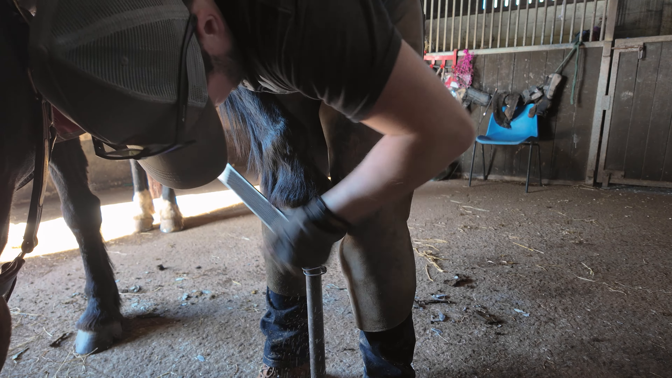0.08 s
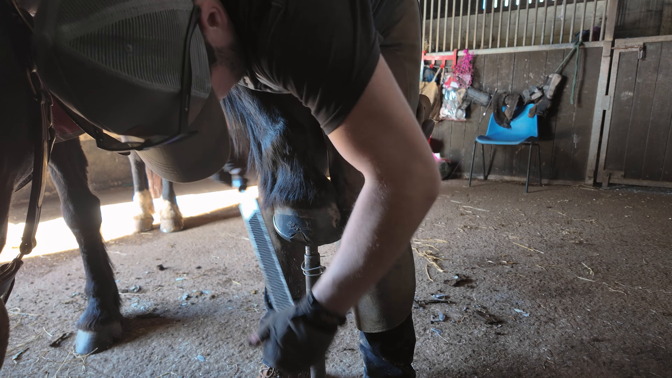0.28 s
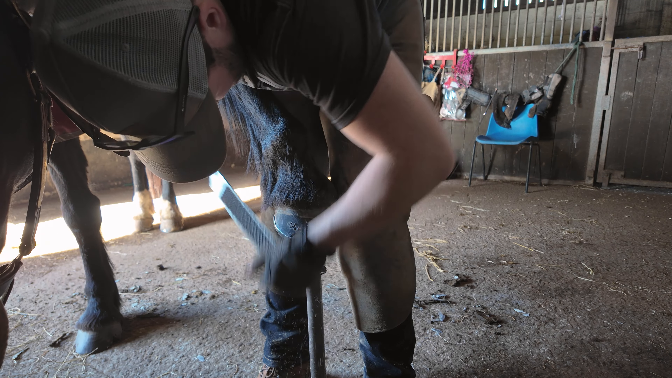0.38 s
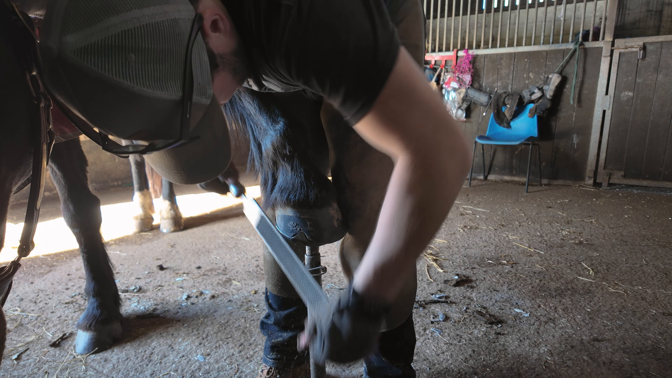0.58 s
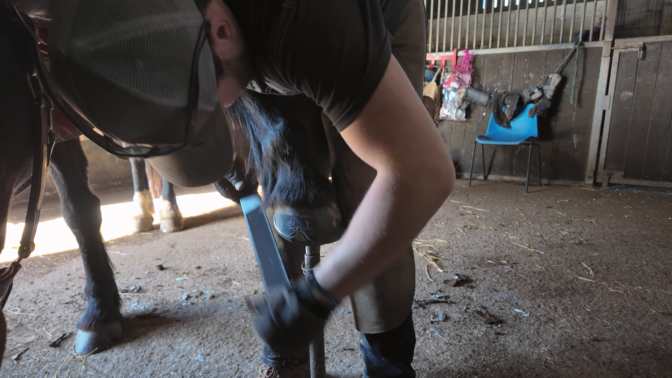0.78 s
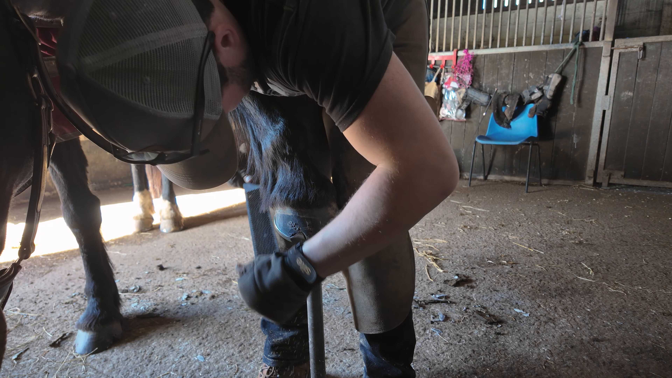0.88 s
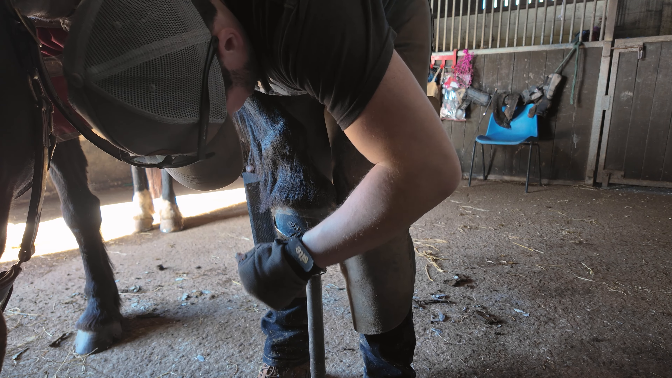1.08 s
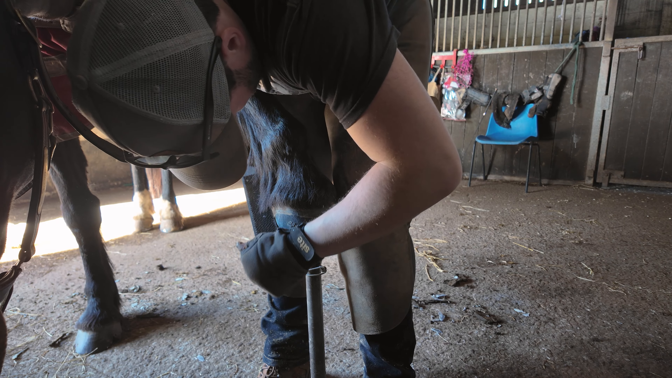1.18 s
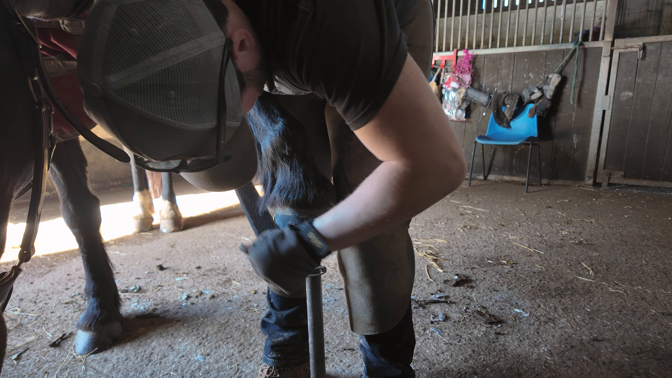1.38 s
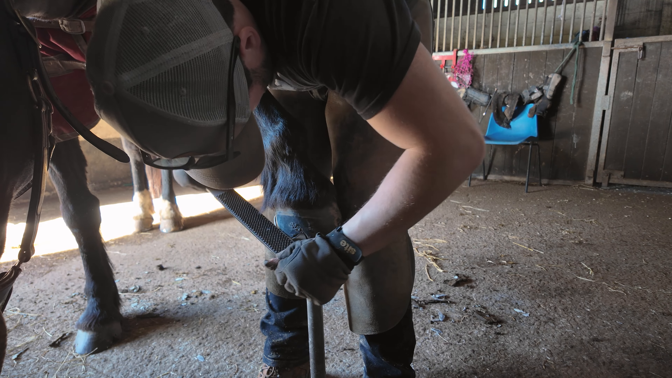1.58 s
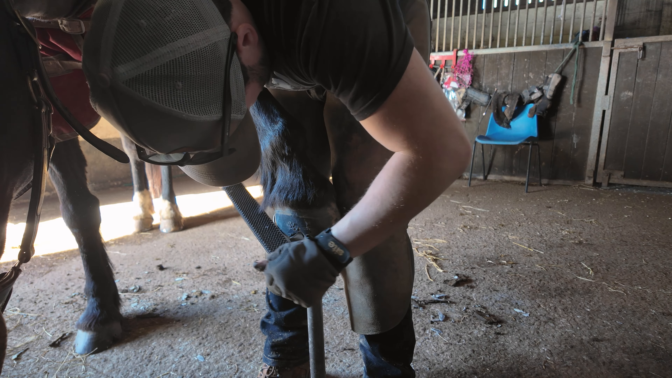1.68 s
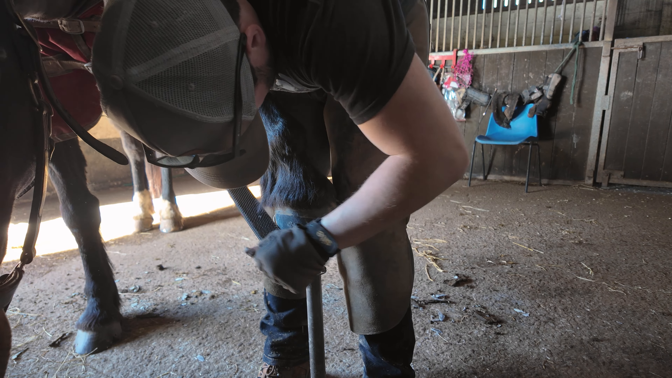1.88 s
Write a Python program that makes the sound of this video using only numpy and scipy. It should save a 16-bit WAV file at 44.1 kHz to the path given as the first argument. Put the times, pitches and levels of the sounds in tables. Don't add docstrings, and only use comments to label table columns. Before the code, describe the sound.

A steel rasp works a horse's hoof, heard close in a quiet stable with short echoes. Two hard strokes, 0.15-0.4 s and 0.55-0.8 s, crackle densely with bright metallic ringing, woody hoof resonance and low iron-stand thumps; the steel rings freer as each ends. Much lighter flicks follow near 1.04, 1.2-1.3, 1.56 and 1.84 s. Faint cloth and straw rustle continues throughout.

```python
import sys
import numpy as np
from scipy import signal
from scipy.io import wavfile
from scipy.ndimage import uniform_filter1d

SR = 44100
rng = np.random.default_rng(int(sys.argv[2]) if len(sys.argv) > 2 else 0)


def undo_db(level):
    steps = np.asarray(level, float) / 20
    return 10 ** steps


def bounce(signal):
    frames = np.transpose(np.atleast_2d(signal))
    limited = np.clip(frames, -1, 1)
    pcm = np.round(limited * 32767).astype(np.int16)
    wavfile.write(sys.argv[1], SR, pcm)


N = 83790
TIME_S = np.arange(N) / SR
WANDER = 0.003


def evened(x):
    return x / np.sqrt(np.mean(x ** 2) + 1e-20)


def slow(count):
    once = uniform_filter1d(rng.standard_normal(N), count)
    return evened(uniform_filter1d(once, count))


def grit(per_s, spread_db):
    draw, size, sign = rng.random(N), rng.exponential(1, N), rng.standard_normal(N)
    click = np.clip((per_s / SR - draw) * SR / 200, 0, 1)
    return evened(click * undo_db(spread_db * np.minimum(size, 4)) * sign)


def read(points, hz):
    f, value = np.transpose(points)
    return np.interp(np.log(hz + 1), np.log(f + 1), value)


def coloured(x, spectrum):
    level_db = read(spectrum, abs(np.fft.fftfreq(4096, 1 / SR)))
    log_gain = np.log(undo_db(np.maximum(level_db, -100)))
    taps = np.fft.ifft(np.exp(np.conj(signal.hilbert(log_gain)))).real[:2048]
    return signal.oaconvolve(x, taps / np.linalg.norm(taps))[:N]


def ring(x, hz, width_hz):
    skirt = 5.9
    turn = np.exp(2j * np.pi * np.cumsum(hz * np.ones(N)) / SR)
    r = np.exp(-np.pi * width_hz / SR)
    wide = np.exp(-np.pi * skirt * width_hz / SR)
    still = x / turn + 1e-18
    damped = signal.lfilter([(1 - r) * (1 - wide)], [1, -r - wide, r * wide], still)
    return 2 * (turn * damped).real


def body(x, modes, contact=None):
    node_depth, node_hz = 0.99, 90.1
    out = np.zeros(N)
    for k, (hz, width_hz, db) in enumerate(modes):
        shape = 1
        if contact is not None:
            standing = abs(np.cos(np.pi * np.sqrt(hz / node_hz) * contact + k))
            shape = 1 - node_depth + node_depth * np.sqrt(2) * standing
        pitch_hz = hz * (1 + WANDER * slow(count=500))
        out += (-1) ** k * undo_db(db) * ring(x * shape, pitch_hz, width_hz)
    power = sum(np.pi * width_hz / SR * undo_db(2 * db) for _, width_hz, db in modes)
    return out / np.sqrt(power)


# pitch_hz, level_db [dB per Hz]
AIR_SPECTRUM = [(30, -1.5), (80, -1.5), (136, -12.5), (340, -6.5), (600, -17), (1500, -19.5), (3500, -19.5),
                (15500, -57)]


def air():
    level_db = -55.5 - 4.5 + 0.14 * slow(count=2000)
    return undo_db(level_db) * coloured(rng.standard_normal(N), AIR_SPECTRUM)


# start_s, level_db
RUSTLE_LEVEL = [(0, -48), (0.032, -51), (.11, -51.5), (.16, -53), (.42, -54.5), (0.501, -51.5),
                (.55, -57.5), (.8, -51), (.87, -56.5), (0.944, -55), (0.981, -65), (1.1, -63), (1.15, -60),
                (1.4, -60.5), (1.46, -63), (1.62, -54), (1.68, -73), (1.9, -55.5)]
# pitch_hz, level_db [dB per Hz]
CLOTH_SPECTRUM = [(70, -16), (150, -7), (330, 0.5), (800, -3), (1500, -7.5), (2600, -3), (6050, -5.5),
                  (15500, -36.5)]


def rustle():
    level_db = np.interp(TIME_S, *np.transpose(RUSTLE_LEVEL)) + 1.8 * slow(count=500)
    return coloured(undo_db(level_db) * grit(11100, 1.0), CLOTH_SPECTRUM)


# start_s, gain_db
LIFTS_OFF = [
    (.372, 14.5),
    (0.742, 10),
]


def lift_db():
    rise_s, hold_s = 0.025, 0.12
    gain_db = np.zeros(N)
    for start_s, peak_db in LIFTS_OFF:
        swell = np.exp(-(np.minimum(TIME_S - start_s, 0) / rise_s) ** 2)
        gain_db += peak_db * swell * (TIME_S < start_s + hold_s)
    return gain_db


# start_s, scrape_db [teeth], weight_db [on hoof]
HARD_PUSHES = [
    [(0.15, -56.5, -54), (0.168, -38.5, -49.5), (0.186, -45.5, -69), (0.208, -40.5, -54.5),
     (0.23, -23, -31.5), (0.248, -27.5, -34), (0.346, -28, -40), (0.377, -39.5, -40.5), (0.405, -56.5, -57)],
    [(0.553, -58, -62), (0.558, -36, -38), (0.59, -39.5, -48), (0.628, -28.5, -31.5), (0.651, -30, -38),
     (0.713, -25.5, -33), (0.748, -33, -43.5), (0.76, -53, -53), (0.82, -53.5, -59.5)],
]
# start_s, scrape_db [teeth], weight_db [on hoof]
LIGHT_FLICKS = [
    [(1.03, -83, -82), (1.04, -51, -64), (1.046, -50, -46), (1.09, -79, -71), (1.108, -77, -61),
     (1.13, -66, -85)],
    [(1.189, -72, -62), (1.196, -50, -45), (1.216, -57.5, -55), (1.24, -52.5, -48), (1.284, -39, -43),
     (1.304, -61, -56.5), (1.34, -71, -69)],
    [(1.51, -68, -60), (1.55, -54.5, -58), (1.563, -40.5, -48), (1.577, -39, -49), (1.592, -52, -58),
     (1.608, -74, -62), (1.66, -64, -60)],
    [(1.82, -76, -84), (1.836, -67, -51), (1.843, -52, -48.5), (1.862, -51, -44.5), (1.88, -76, -56),
     (1.9, -65, -61)],
]
# pressed_db, free_db, horn_db, contact_start [0-1 of bar]
STROKE_GRIP = [(-5.5, -21, -8.5, 0.17), (-3, -15.5, -7, 0.21), (-3, -6, 0.5, 0.41), (-10.5, -8, -6, 0.47),
               (-23, -4.5, -4, 0.44), (-8, -5, -7, .5)]
# from_hz, to_hz, bend_db
STROKE_BEND = [(594, 458.5, -3), (656, 437, -5.5), (477, 530, 4.5), (521, 420, -6.5), (507, 920, -9.5),
               (800, 600, -11)]


def strokes():
    travel_per_s, glide_s = 2.12, (0.065, 0.2)
    hoof_db, stand_db = -1, -13.5
    chips = grit(4916, 1.5) * undo_db(0.5 * slow(count=120))
    lift = lift_db()
    drive = np.zeros((6, N))
    contact, bend_hz = np.ones(N), np.ones(N)
    curves = HARD_PUSHES + LIGHT_FLICKS
    for i, (curve, grip, bend) in enumerate(zip(curves, STROKE_GRIP, STROKE_BEND)):
        s, scrape_db, weight_db = np.transpose(curve)
        pressed_db, free_db, horn_db, contact_start = grip
        from_hz, to_hz, bend_db = bend
        since_s = TIME_S - s[0]
        edges = np.minimum(since_s, s[-1] + 0.037 - TIME_S)
        touching = np.clip(edges / 0.015, 0, 1) * chips
        scrape = undo_db(np.interp(TIME_S, s, scrape_db)) * touching
        weight = undo_db(np.interp(TIME_S, s, weight_db)) * touching
        drive[0] += undo_db(pressed_db) * scrape
        drive[1] += undo_db(free_db + lift) * scrape
        drive[2] += undo_db(horn_db) * scrape
        drive[3:] += undo_db([hoof_db, stand_db, bend_db])[:, None] * weight
        late = (since_s >= 0) | (i == 0)
        contact[late] = (contact_start + travel_per_s * since_s)[late]
        bend_hz[late] = np.interp(since_s, glide_s, [from_hz, to_hz])[late]
    return drive, contact, bend_hz


# start_s, tick_db, steel_db, hoof_db, stand_db
TOUCH_DOWNS = [
    (0.1647, -31, 2, -10, -15.5),
    (0.5557, -30.5, 9.5, -7.5, -11),
    (1.042, -40.5, -10, -0.5, -3.5),
    (1.1937, -45.5, 11.5, 2.5, -4.5),
    (1.563, -49, -21, -37, -3.5),
]


def touches():
    blow = signal.windows.hann(8)[1:-1] / 3
    drive = np.zeros((6, N))
    for start_s, tick_db, steel_db, hoof_db, stand_db in TOUCH_DOWNS:
        part_db = np.array([steel_db + 9, steel_db - 5, 13, hoof_db + 19.5, stand_db + 23.5, hoof_db + 12.5])
        at = round(start_s * SR)
        drive[:, at:at + len(blow)] += blow * undo_db(tick_db + part_db)[:, None]
    return drive


PRESSED_PITCH = [3030, 3520, 3910, 4450, 4800, 5380, 5990, 6150, 6550, 6990, 7750, 8500, 9560, 10390]
# width_hz, level_db
PRESSED_MODES = [(123, 1.5), (100, -1), (74, 5.5), (88, -3.5), (84, 5), (100, 2), (78, 4), (86, 7.5),
                 (100, 7.5), (135, 0.5), (87, -4.5), (196, -8), (90, -8), (69, -11.5)]
FREE_PITCH = [3820, 4410, 4750, 5450, 5980, 6530, 7705, 8980, 10380, 11570, 12015]
# width_hz, level_db
FREE_MODES = [(40.2, 6.5), (37.5, 8.5), (50.6, 7), (50.7, 3), (55, -21), (32, -45), (42, 0), (45, -1.5),
              (55, -16), (32, -9), (28, -13)]


def steel_bar(pressed_drive, free_drive, contact):
    contact = contact + 0.046 * slow(count=250)
    pressed = body(pressed_drive, np.c_[PRESSED_PITCH, PRESSED_MODES], contact)
    return pressed + body(free_drive, np.c_[FREE_PITCH, FREE_MODES], contact)


# pitch_hz, level_db [dB per Hz]
HORN_SPECTRUM = [(120, -57), (500, -8), (1100, 7), (2500, 6.5), (6500, 9.5), (8000, -15), (12000, -11.5),
                 (15500, -26)]


def torn_horn(drive):
    return coloured(drive, HORN_SPECTRUM)


# pitch_hz, width_hz, level_db
HOOF_MODES = [(530, 31, 3.5), (760, 130, 3), (830, 203, 9), (1225, 296, 3.5), (1464, 163, 0),
              (1679, 102, 7.5)]


def hoof(drive):
    return body(drive, HOOF_MODES)


# pitch_hz, width_hz, level_db
STAND_MODES = [(125, 57, -6), (232.6, 21, -2.5), (324.4, 28.4, 1)]


def stand_ring(drive):
    return body(drive, STAND_MODES)


def bending(drive, bend_hz):
    width_hz, second_ratio, second_db = 34, 1.543, -13
    first = ring(drive, bend_hz, width_hz)
    second = ring(drive, second_ratio * bend_hz, 2 * width_hz)
    return (first + undo_db(second_db) * second) / np.sqrt(np.pi * width_hz / SR)


def rasp():
    drive, contact, bend_hz = strokes()
    pressed, free, horn, on_hoof, on_stand, bend = drive + touches()
    return (steel_bar(pressed, free, contact) + torn_horn(horn) + hoof(on_hoof)
            + stand_ring(on_stand) + bending(bend, bend_hz))


# start_s, pitch_hz, peak_db, length_s
SNAGS = [(0.228, 4450, -25, 0.0065), (0.231, 3970, -28.5, 0.0059), (0.234, 2993, -25, 0.0046),
         (0.236, 6030, -25.5, 0.0076), (0.237, 5420, -28, 0.0088), (0.244, 4840, -23, 0.01),
         (0.246, 3860, -30, 0.0072), (0.249, 6100, -20, 0.0069), (0.252, 7040, -26, 0.0039),
         (0.259, 5380, -25, 0.019), (0.287, 4760, -25, 0.0074), (0.291, 5940, -24, 0.0048),
         (0.292, 5380, -26, 0.0075), (0.302, 4880, -27, 0.0055), (0.31, 3090, -31, 0.0086),
         (0.329, 4670, -29, 0.011), (0.335, 5990, -31.5, 0.015), (0.618, 6140, -26, 0.0064),
         (0.622, 5450, -29, 0.005), (0.626, 4860, -26, 0.005), (0.635, 3980, -33, 0.0058),
         (0.64, 6160, -23, 0.0046), (0.648, 5450, -30, 0.005), (0.667, 6050, -27, 0.0071),
         (0.67, 5390, -37, 0.013), (0.676, 3880, -30, 0.0054), (0.684, 6090, -30, 0.007),
         (0.685, 4790, -32, 0.006), (0.686, 3130, -34, 0.014), (0.695, 3960, -29, 0.0036),
         (0.697, 4930, -44, 0.0069), (0.698, 6460, -48, 0.0072), (0.707, 3100, -25, 0.0038),
         (0.704, 4520, -26, 0.0038), (0.705, 3890, -23.5, 0.0044), (0.706, 6200, -31, 0.004),
         (0.724, 6360, -40, 0.0067),
         (0.167, 6000, -35.5, 0.004), (1.277, 4790, -46, 0.0085), (0.362, 11600, -61, 0.036),
               (0.37, 6630, -42, 0.015), (0.551, 6040, -36, 0.035), (0.736, 7720, -35, 0.012),
               (.742, 4460, -40, 0.021), (0.744, 11900, -58, 0.027), (1.043, 534, -45.5, 0.018),
               (1.196, 527, -42, 0.021), (1.196, 852, -45.5, 0.01), (1.216, 493, -43, 0.027),
               (1.268, 800, -41.5, .012), (1.258, 3840, -44, 0.031), (1.038, 8980, -60, 0.025),
               (0.231, 7750, -39, .01), (0.243, 9560, -39, 0.0047), (1.563, 4830, -35, .006),
               (1.565, 6570, -49, .013), (1.57, 5340, -50, .008), (1.571, 4740, -33, 0.0097),
               (1.601, 4690, -47, 0.012), (1.771, 6100, -62, .006), (1.788, 7470, -66, 0.0087),
               (1.834, 4780, -52.5, 0.022), (1.852, 5510, -56, .017), (1.872, 4780, -54, 0.015),
               (1.864, 4780, -46.5, .01), (1.89, 4740, -52, .014)]


def catches():
    swell, flutter = 0.4, 0.3
    out = np.zeros(N + SR)
    chance = np.r_[slow(count=60), np.zeros(SR)]
    for start_s, hz, peak_db, length_s in SNAGS:
        at = round(start_s * SR)
        u = np.arange(round(4 * length_s * SR)) / (swell * length_s * SR)
        waver = chance[at:at + len(u)]
        tone = np.sin(2 * np.pi * hz * np.cumsum(1 + WANDER * waver) / SR)
        out[at:at + len(u)] += undo_db(peak_db) * (1 + flutter * waver) * u * np.exp(1 - u) * tone
    return out[:N]


# start_s, peak_db, pitch_hz, rise_s, t60_s
STAND_THUMPS = [(0.21, -41, 100, .02, 0.067), (0.303, -40, 95.9, 0.0099, 0.4),
                (0.555, -46, 115, 0.0068, 0.06), (0.682, -45.5, 100, 0.015, 0.25),
                (0.73, -52, 104, 0.0057, 0.087), (1.043, -34.5, 129, 0.004, 0.052),
                (1.195, -39.5, 114, 0.013, 0.05), (1.291, -50, 125, 0.0074, 0.17),
                (1.559, -43.5, 110.4, 0.031, 0.05), (1.836, -47.5, 121.4, 0.0096, 0.22)]


def stand_thumps():
    out = np.zeros(N)
    for start_s, peak_db, hz, rise_s, t60_s in STAND_THUMPS:
        u = np.maximum(TIME_S - start_s, 0)
        rise = np.sin(np.pi / 2 * np.minimum(u / rise_s, 1)) ** 2
        decay = undo_db(peak_db - 60 * np.maximum(u - rise_s, 0) / t60_s)
        out += decay * rise * np.sin(2 * np.pi * hz * u)
    return out


# pitch_hz, t60_s
STABLE_DECAY = [(100, 0.57), (500, 0.45), (2000, 0.096), (6000, 0.17), (12000, 0.078)]


def stable(x):
    taps = np.zeros(SR // 2)
    at = np.arange(200, SR // 2 - 20, 20)
    taps[at + rng.integers(0, 20, len(at))] = rng.choice([-1., 1.], len(at))
    hz, t, z = signal.stft(taps, SR, nperseg=256)
    t60_s = np.maximum(read(STABLE_DECAY, hz), 0.05)
    tail = signal.istft(z * undo_db(-60 * t / t60_s[:, None]), SR, nperseg=256)[1]
    return signal.fftconvolve(x, tail / np.linalg.norm(tail))[:N]


def scene():
    tool = rasp() + catches() + stand_thumps()
    room_db = -16
    return (air() + rustle() + tool + undo_db(room_db) * stable(tool))[None]


def low_pass(x):
    return signal.sosfilt(signal.butter(12, 15690, fs=SR, output="sos"), x)


def record(dry):
    bass_cut = signal.butter(6, 55, "high", fs=SR, output="sos")
    band_edge = signal.firwin(301, 15700, window=("kaiser", 9), fs=SR)
    mix = signal.oaconvolve(signal.sosfilt(bass_cut, dry), band_edge[None], "same")
    return low_pass(mix)


dry = scene()
out = record(dry)
bounce(out)
```